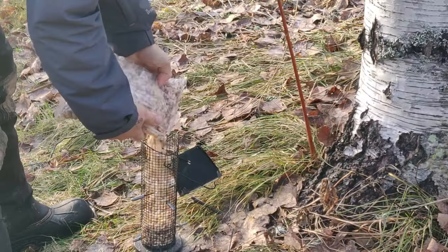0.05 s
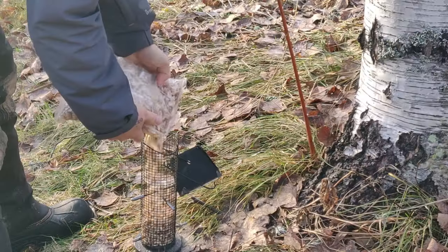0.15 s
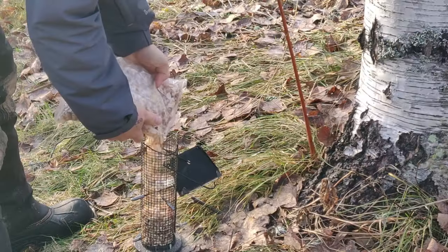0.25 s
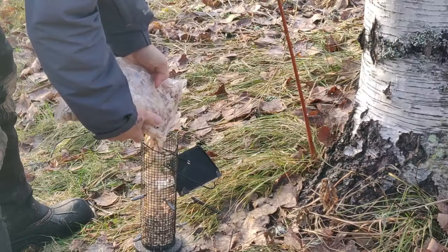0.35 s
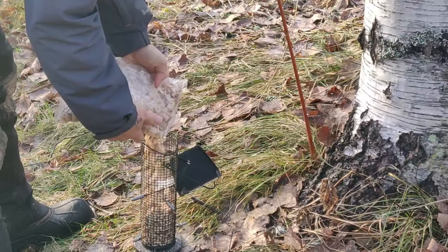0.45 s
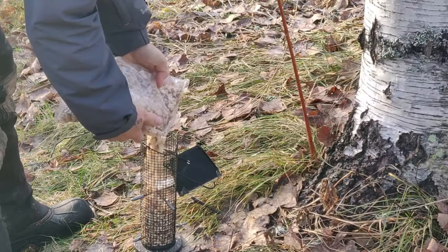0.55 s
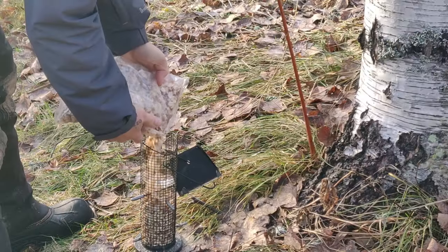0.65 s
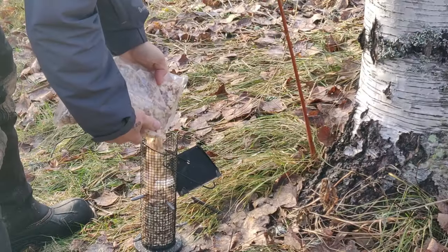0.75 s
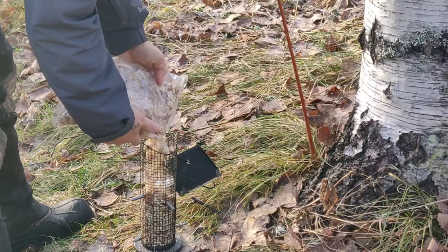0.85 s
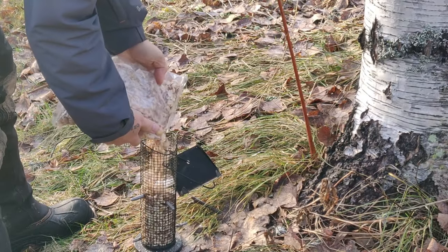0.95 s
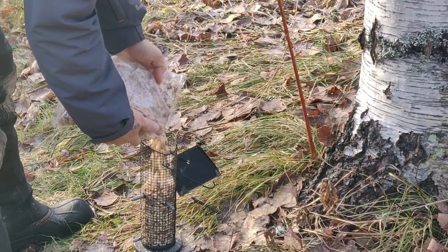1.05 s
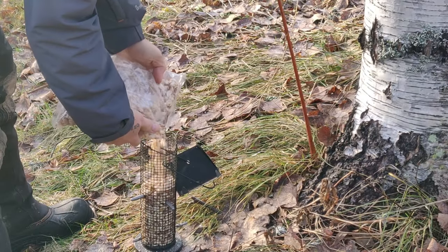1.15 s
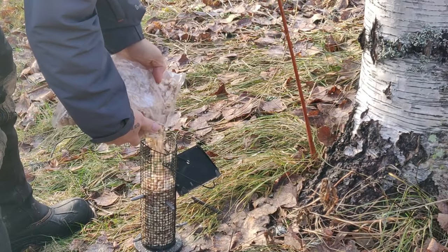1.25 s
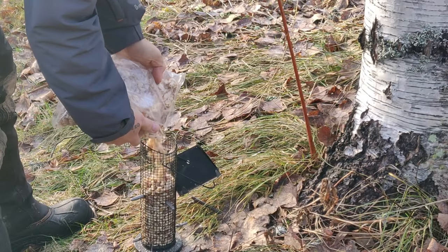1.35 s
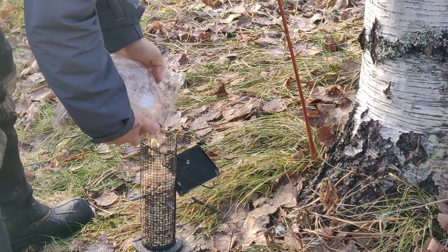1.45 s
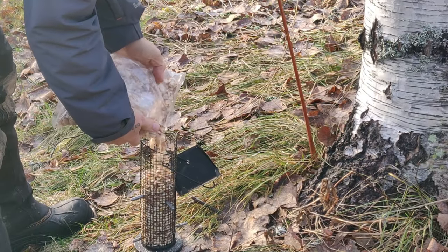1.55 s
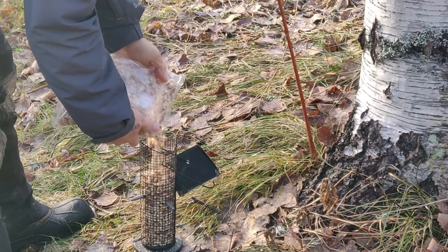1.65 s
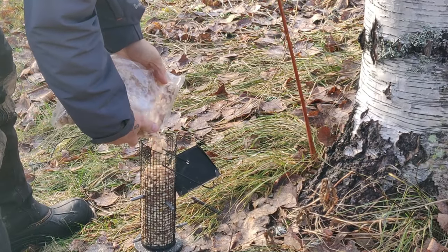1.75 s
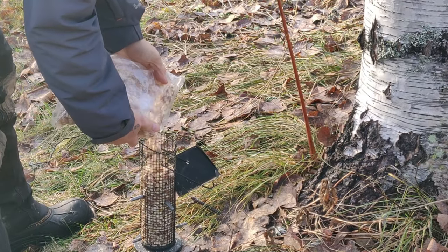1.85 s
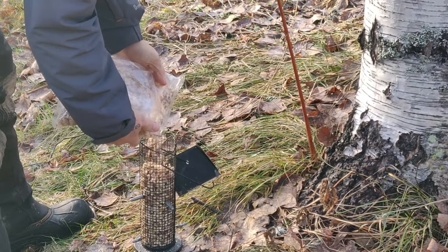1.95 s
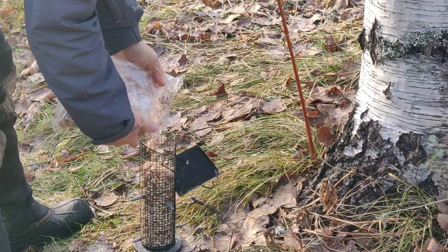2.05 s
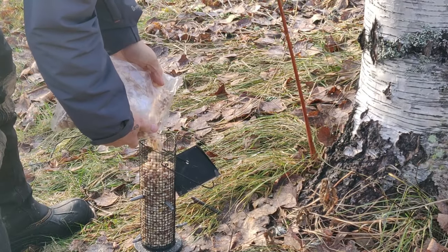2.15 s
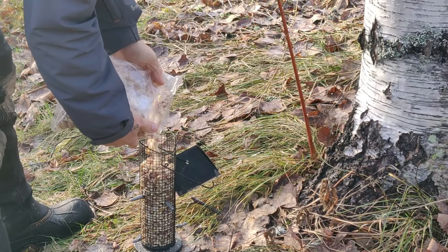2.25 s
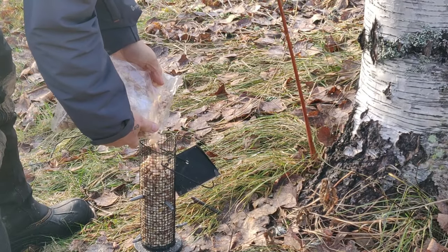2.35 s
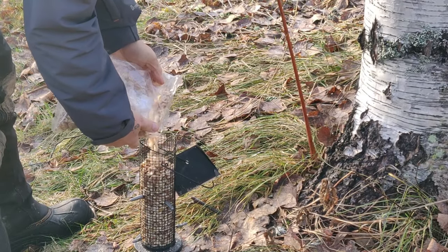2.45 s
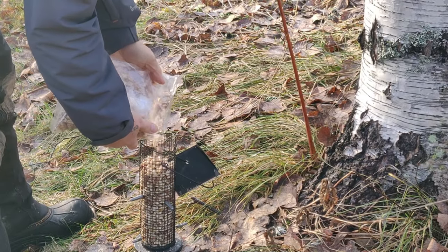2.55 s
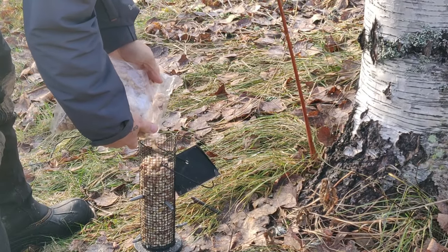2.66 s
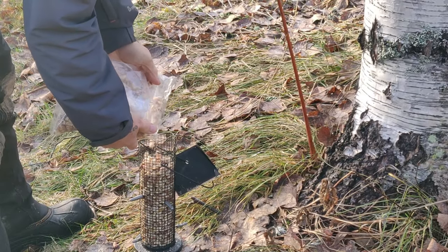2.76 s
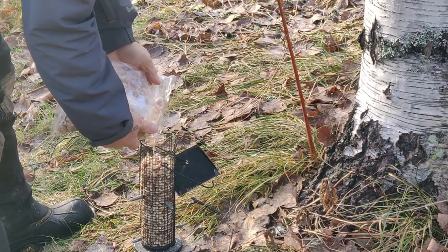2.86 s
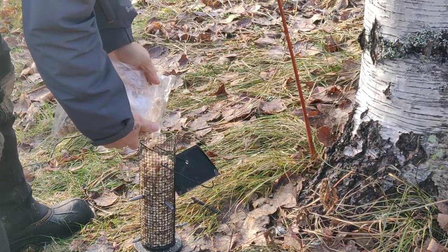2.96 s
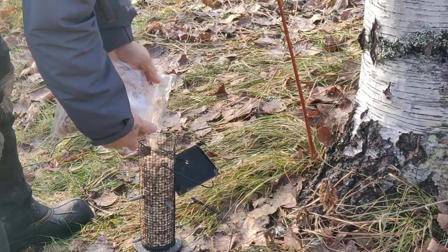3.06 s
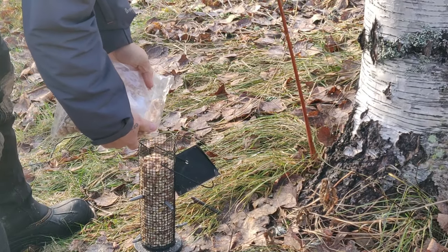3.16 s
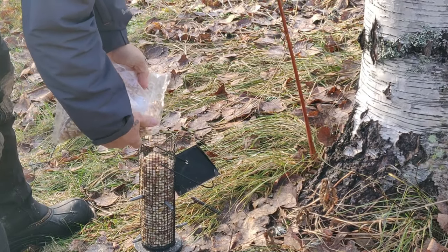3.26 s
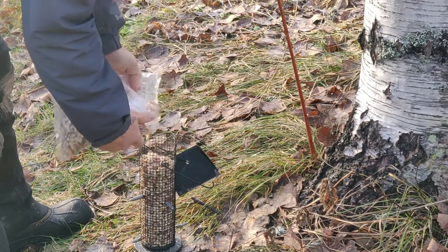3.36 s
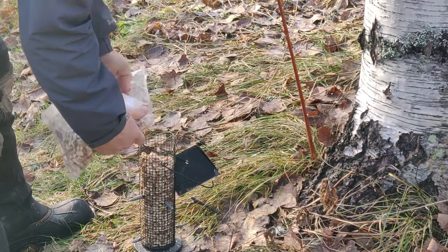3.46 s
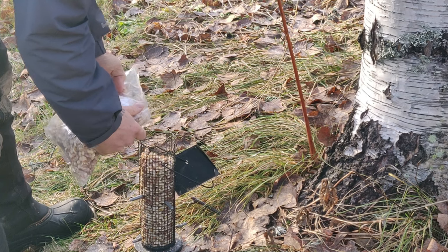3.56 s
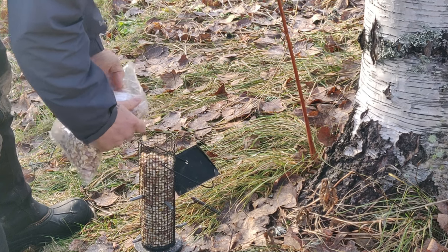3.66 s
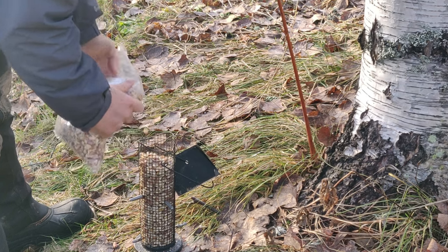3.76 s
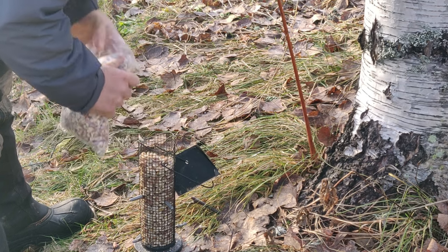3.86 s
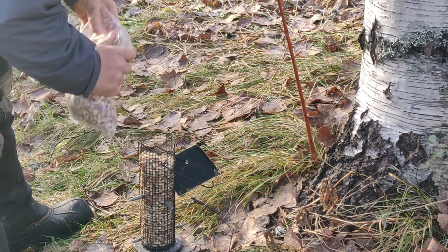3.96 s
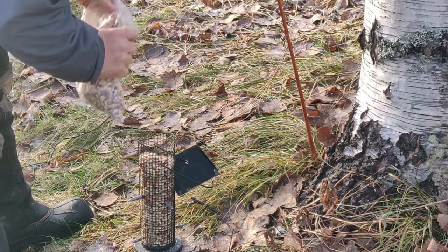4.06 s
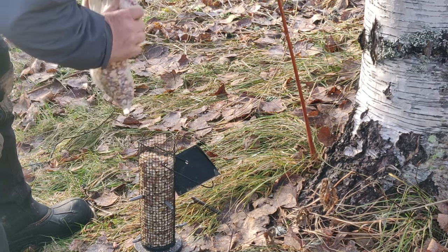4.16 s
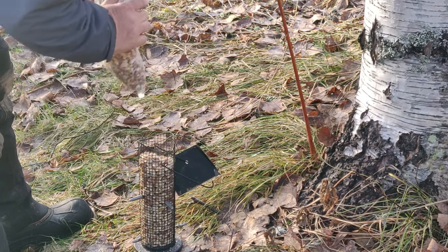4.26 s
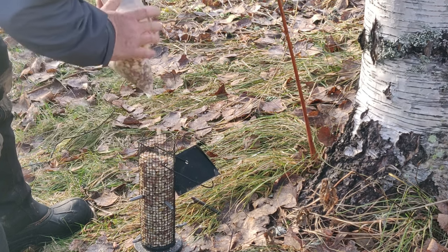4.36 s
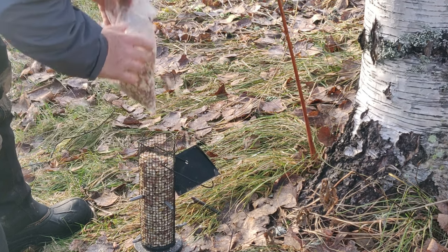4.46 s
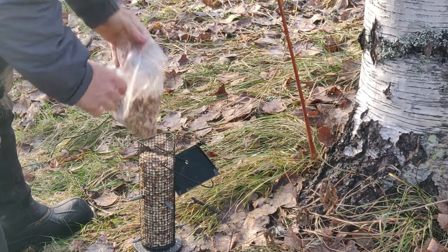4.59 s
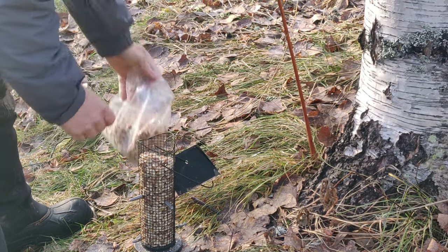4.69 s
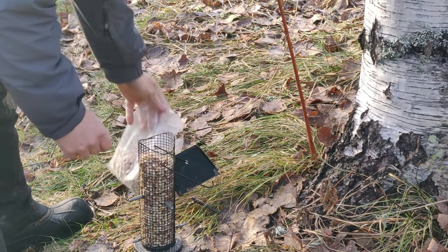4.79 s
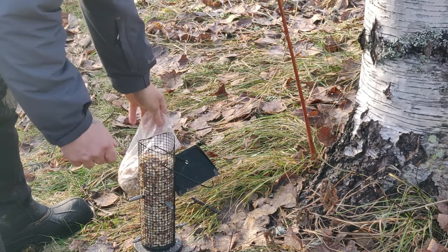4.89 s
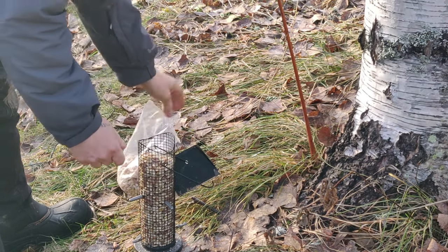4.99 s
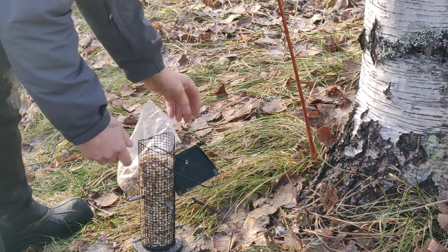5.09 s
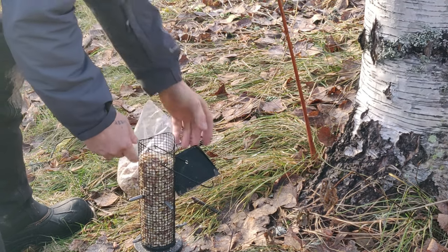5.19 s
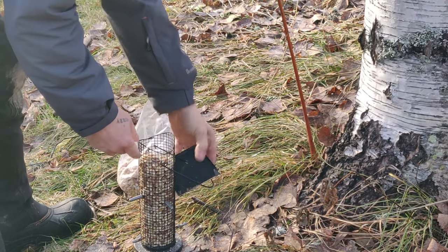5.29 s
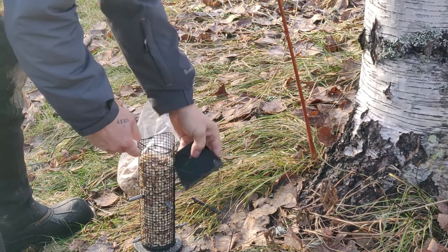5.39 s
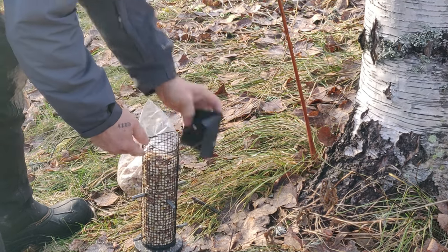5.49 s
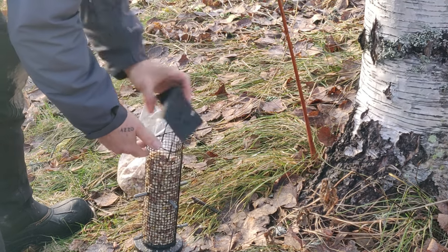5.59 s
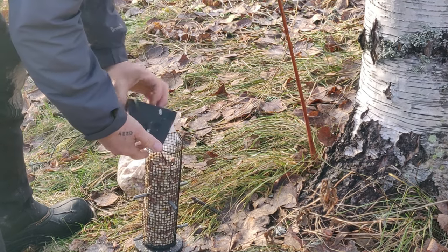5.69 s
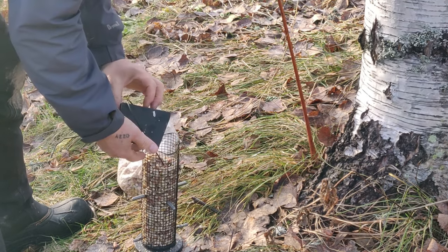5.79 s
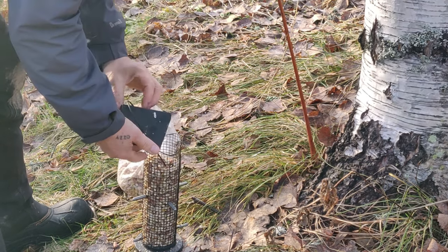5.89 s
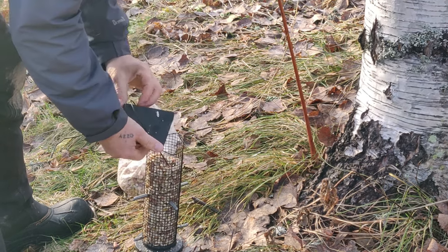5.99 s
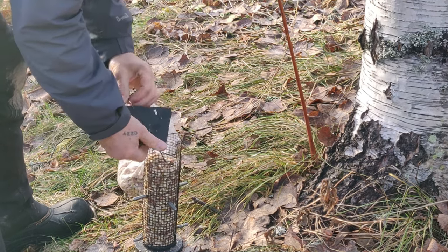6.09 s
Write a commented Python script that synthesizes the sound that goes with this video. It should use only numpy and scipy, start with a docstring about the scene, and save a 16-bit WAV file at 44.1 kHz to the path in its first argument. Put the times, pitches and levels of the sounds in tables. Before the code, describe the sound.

Outdoors, close up, dry seed pours quickly into a wire-mesh bird feeder, ticking and ringing thinly. The stream slackens after a second while the plastic bag crackles and snaps and a few kernels land dully. The bag is shaken and lifted with loud crisp crackling, set down with another burst, then a small lid clacks and scrapes on the rim. Bright, small stereo microphones, faint steady air.

```python
"""Seed pours from a thin plastic bag into a wire-mesh bird feeder in grass, and thins as the feeder fills.
The bag crinkles and snaps as it is shaken, lifted and put down; then the lid knocks and scrapes on the rim.
Kernels, film and creases are tiny noisy cracks given a colour; mesh and lid ring as decaying sines.
Filtered noise makes the still outdoor air. Two small microphone ports pick it all up, the left one
with a sharp treble resonance."""
import sys
import numpy as np
from scipy import signal
from scipy.fft import rfft, irfft
from scipy.io import wavfile
from scipy.ndimage import map_coordinates

SR = 44100
rng = np.random.default_rng(int(sys.argv[2]) if len(sys.argv) > 2 else 0)


def store_wav(level_fs):
    """Save 16-bit WAV to argv[1]."""
    pcm = np.round(np.clip(np.atleast_2d(level_fs), -1, 1) * 32767)
    wavfile.write(sys.argv[1], SR, pcm.T.astype(np.int16))


N = 270402
TIME = np.arange(N) / SR
BRIEF = TIME[:2560]   # time axis of one tiny impact


def from_db(db):
    """Decibels to gain."""
    return 10 ** (np.asarray(db) / 20)


def rms_one(x):
    """Scale to rms 1."""
    return x / np.sqrt(np.mean(x ** 2) + 1e-20)


def unit(x):
    """Scale to unit energy in the first channel."""
    return x / np.linalg.norm(np.atleast_2d(x)[0])


def gains(rows):
    """Each dB column of a curve as a gain in time, fading out beyond its ends."""
    s, *columns = np.transpose(rows)
    outside = np.maximum(0, np.maximum(s[0] - TIME, TIME - s[-1]))
    fade = np.exp(-(outside / 0.067) ** 2)
    return [from_db(np.interp(TIME, s, column)) * fade for column in columns]


ATTACK_S, RELEASE_S = 0.021, 0.015   # straight swell before the start; time constant of the dying away


def strokes(rows):
    """Movements of the hand swell, hold and die away; one gain in time for each dB column."""
    total = 0
    for s, length, *levels in rows:
        rise = np.clip(1 + (TIME - s) / ATTACK_S, 0, 1)
        fall = np.exp(-np.maximum(0, TIME - s - length) / RELEASE_S)
        total = total + from_db(levels)[:, None] * rise * fall
    return total


def drift(rate):
    """Random wandering with rms 1, taking a new direction `rate` times a second."""
    knots = rng.standard_normal(4096)
    return rms_one(np.interp(TIME * rate, np.arange(len(knots)), knots))


def response(points):
    """Causal (minimum-phase) impulse response of a spectrum."""
    size = 1024
    hz, db = np.transpose(points)
    grid = np.maximum(np.fft.rfftfreq(size, 1 / SR), 1)
    smooth_db = np.interp(np.log(grid), np.log(hz), db)
    cepstrum = irfft(np.log(from_db(smooth_db)))
    # folding the cepstrum forward puts all the response after the impulse
    cepstrum[1:size // 2] *= 2
    cepstrum[size // 2 + 1:] = 0
    return irfft(np.exp(rfft(cepstrum)))


def through(x, impulse):
    """Filter both channels with an impulse response."""
    return signal.oaconvolve(x, np.atleast_2d(impulse), axes=1)[:, :x.shape[1]]


def colour(x, points):
    """Give white sound a spectrum and keep its power."""
    return through(x, unit(response(points)))


def peak(x, hz, q=4):
    """The part of a sound around one pitch, at unit energy."""
    return unit(signal.lfilter(*signal.iirpeak(hz, q, fs=SR), x))


def add(out, s, sound):
    """Mix a sound in at time s."""
    start = min(round(s * SR), N - 1)
    out[:, start:start + sound.shape[1]] += sound[:, :N - start]


PORTS_PART_HZ, BASS_SIDE_DB = 3160, -9   # where the ports begin to differ; their difference in the bass


def diffuse(size, part_hz=PORTS_PART_HZ):
    """Noise from all round: nearly alike at both ports in the bass, unrelated in the treble."""
    mid, side = rng.standard_normal((2, size))
    b, a = signal.butter(1, part_hz, "high", fs=SR)
    bass_side = from_db(BASS_SIDE_DB)
    side = bass_side * side + (np.sqrt(.5) - bass_side) * signal.lfilter(b, a, side)
    mid = mid - (1 - np.sqrt(.5)) * signal.lfilter(b, a, mid)
    return mid + side * [[1], [-1]]


def crack(t60, scatter_db, scatter_t60):
    """One tiny impact of unit energy: a click, a brief buzz, then scatter off the ground and the tree."""
    click = signal.unit_impulse(len(BRIEF))
    buzz = unit(rng.standard_normal(len(BRIEF)) * from_db(-60 * BRIEF / t60))
    scatter = unit(diffuse(len(BRIEF)) * from_db(-60 * BRIEF / scatter_t60))
    return unit(click + buzz + from_db(scatter_db) * scatter)


GRAIN_T60_S = 0.06   # 60 dB decay time of the scatter behind each grain


def grains(per_s, spread_db, t60, scatter_db, low_hz, high_hz, ring_db, clump_db=2.5, count=48):
    """Random impacts of uneven size that come in louder clumps, each favouring one of many pitches; rms 1."""
    born = rng.random(N) < per_s / SR
    uneven_db = spread_db * np.clip(rng.standard_normal(N), -2, 2)
    clumps_db = clump_db * np.clip(drift(130), -1.7, 1.7)
    clicks = born * from_db(uneven_db + clumps_db) * rng.choice([-1, 1], N) / np.sqrt(per_s)
    shapes = []
    for hz in np.geomspace(low_hz, high_hz, count):
        plain = crack(t60, scatter_db, GRAIN_T60_S)
        shapes.append(unit(plain + from_db(ring_db) * peak(plain, hz)))
    dealt = rng.integers(0, count, N)
    out = np.zeros((2, N))
    for i in np.flatnonzero(born):
        add(out, i / SR, clicks[i] * shapes[dealt[i]])
    return rms_one(out)


def ringing(modes, spread_db=0):
    """Decaying sines of a struck body; spread_db varies the strength of each by chance."""
    t = TIME[:SR // 4]
    total = 0
    for k, (hz, db, t60) in enumerate(modes):
        decay = from_db(db + spread_db * rng.normal() - 60 * t / t60)
        total = total + decay * np.sin(2 * np.pi * hz * t) * (-1) ** k
    return total


# Colour of the outdoor air. Each row: frequency in Hz, level in dB per Hz.
AIR_COLOUR = [(20, 1.5), (60, 0), (130, -9.5), (300, -12.5), (600, -9), (1300, -18.5), (2200, -20),
              (4000, -15.5), (6500, -18), (9000, -9), (15000, -4.5)]
AIR_DB = -51.5   # before the microphone ports


def air():
    """Still outdoor air is a faint steady noise from all round."""
    return from_db(AIR_DB) * colour(diffuse(N, part_hz=394), AIR_COLOUR)


# Colour of the lid touching the wire. Each row: frequency in Hz, level in dB per Hz.
LID_COLOUR = [(100, -42), (400, -1.5), (900, -1), (1400, -14), (1900, -6.5), (2800, 2), (3600, -4),
              (5000, 1.5), (6500, 0), (8500, 2), (15000, -7)]
# The lid sliding on the wire. Each row: start of the hold in seconds, length in seconds,
# level in dB before it is shared out between slips and singing.
SLIDES_OF_LID = [(5.598, 0.057, -55), (5.685, 0.012, -52), (5.76, 0.034, -70), (5.912, 0.0076, -65),
                 (5.962, 0.012, -61.5), (6.005, 0.017, -63), (6.052, 0.021, -59)]


def lid_scrapes():
    """A sliding lid catches and slips in many tiny impacts, which also make the metal sing."""
    pressure, = strokes(SLIDES_OF_LID)
    slips = grains(350, spread_db=5.0, t60=0.0042, scatter_db=4.0, low_hz=1020, high_hz=6500, ring_db=-4.0)
    slips = colour(slips, LID_COLOUR)
    # each mode: Hz, dB, 60 dB decay time in seconds
    modes = [(1300, 2.5, 0.046), (1440, 4.0, 0.057), (2290, -10, 0.052),
             (2820, -15, 0.04), (5400, -10, .06), (6250, -6, 0.083)]
    singing = rms_one(through(slips, ringing(modes)))
    return pressure * (from_db(-7.0) * slips + from_db(-7.5) * singing)


# The notes in which the mesh tube rings.
# Each row: frequency in Hz, level in dB, 60 dB decay time in seconds.
MESH_MODES = [(766, -8, .11), (1075, -1.5, .035), (1267, -4, .03), (1354, -1, .04), (1434, -2, .04),
              (1497, -4, .08), (2745, -5, .04), (2900, -6, .03), (3585, -14, .12), (4982, -8, .14),
              (5229, -7, .11), (5493, -7, .09), (5773, -10, .1), (6012, -9, .06), (7029, -8, .14)]
# The notes of the lid when least held.
# Each row: frequency in Hz, level in dB, 60 dB decay time in seconds, all before the grip acts.
LID_MODES = [(754, -17, .15), (1980, -14, .12), (2510, -13, .1), (2780, -7, .06), (2900, -8, .04),
             (3079, -3, .35), (3135, -9, .07), (4045, -11, .09), (4200, -13, .07), (4490, -10, .17),
             (4900, -8, .09), (6455, -21, .09), (7004, -10, .1), (7321, -9, .05), (7600, -7, .1),
             (7887, -8, .11), (8371, -10, .08), (8533, -8, .06)]
# Lid against the rim. Each row: time in seconds, clack in dB, ring in dB, pitch of the panel in Hz,
# share of the free ring that the grip leaves (0 to 1), mesh in dB.
LID_KNOCKS = [(5.4017, -23, -53, 1540, 0.3, -54), (5.414, -20.5, -39.5, 1420, 0.85, -66),
              (5.459, -31, -49, 1400, 0.3, -62), (5.574, -20, -47, 1460, 0.27, -54),
              (5.602, -29, -55, 1450, 0.45, -65), (5.626, -32, -61, 1390, .4, -65),
              (5.646, -30, -68, 1460, .4, -65), (5.670, -17, -41.5, 1250, 0.42, -50.5),
              (5.681, -20, -58, 1460, 0.62, -56), (5.707, -28, -44.5, 1280, 0.14, -67),
              (5.815, -38, -63, 1340, 0.32, -76), (5.916, -38, -51, 1320, 0.25, -75),
              (5.958, -40, -52.5, 1330, 0.19, -68), (5.970, -37, -57, 1386, 0.27, -76),
              (6.053, -34, -62, 1310, .4, -69), (6.0863, -26.5, -46.5, 1280, 0.19, -70),
              (6.125, -24, -51, 1010, 0.22, -54)]
HAND_CLOSES_S, HELD_T60_S = 0.051, .03   # the fingers stop the lid's ring soon after a knock
GRIP_DETUNE = .14   # how strongly the grip shifts the pitch of the ring
CHATTER_S, CHATTER_DB = 0.001403, -6   # the lid's edge meets a second wire just after the first
BUZZ_DEPTH, BUZZ_PER_S = 0.16, 510   # loose contact roughens the ring


def lid_knocks():
    """A knock is a double clack, a short panel note, lid modes detuned and stopped by the hand, and mesh ring."""
    out = np.zeros((2, N))
    freest = max(free for *_, free, _ in LID_KNOCKS)
    for s, clack_db, ring_db, panel_hz, free, mesh_db in LID_KNOCKS:
        detune = 1 + GRIP_DETUNE * (freest - free) * rng.uniform(-1.04, 1)
        free = np.clip(free, .05, 1)
        note = ringing([(panel_hz, -4.0, .04)])
        thin_tail = (1 - free) * ringing([(panel_hz, -20, .16)])   # kept when pressed on the rim
        gripped = [(hz * detune, db, t60 * free / freest) for hz, db, t60 in LID_MODES]
        overtones = free * ringing(gripped, spread_db=4.5)
        held = from_db(-60 * np.maximum(0, TIME[:len(note)] - HAND_CLOSES_S) / HELD_T60_S)
        buzz = 1 + BUZZ_DEPTH * drift(BUZZ_PER_S)[:len(note)]
        ring = from_db(ring_db) * (note + thin_tail + overtones) * held * buzz
        mesh = from_db(mesh_db) * ringing(MESH_MODES)
        add(out, s, (ring + mesh)[None])
        for delay, db in ((0, 0), (CHATTER_S, CHATTER_DB)):
            clack = crack(t60=.011, scatter_db=-0.5, scatter_t60=.05)
            add(out, s + delay, from_db(clack_db + db) * colour(clack, LID_COLOUR))
    return out


# Large kernels landing on the heap. Each row: time in seconds, level in dB, pitch in Hz.
KERNEL_THUDS = [(1.776, -33.5, 570), (1.831, -28, 680), (1.974, -25.5, 635), (2.031, -31, 600),
                (2.075, -31.5, 630), (2.105, -33, 650), (2.225, -28.5, 605), (2.267, -32, 1130),
                (2.528, -36, 620), (2.588, -34.5, 620), (2.655, -42, 596), (3.112, -34, 520),
                (3.242, -34, 780), (3.429, -31, 1000), (3.463, -29, 700), (3.541, -28.5, 760),
                (3.664, -31, 740), (3.757, -33, 715), (4.037, -28, 654), (4.21, -24, 373),
                (4.356, -31, 410)]
# Colour of a thud at the pitch HEAP_HZ. Each row: frequency in Hz, level in dB per Hz.
HEAP_COLOUR = [(150, -18.5), (380, -6), (650, 3.5), (900, -6), (1500, -37), (4000, -17)]
HEAP_HZ = 650


def heap():
    """Large kernels land dully on the pile, in the feeder and later in the bag; pitch shifts the whole colour."""
    out = np.zeros((2, N))
    for s, db, pitch_hz in KERNEL_THUDS:
        spectrum = [(hz * pitch_hz / HEAP_HZ, level) for hz, level in HEAP_COLOUR]
        thud = colour(crack(t60=0.0061, scatter_db=1.0, scatter_t60=0.074), spectrum)
        add(out, s, from_db(db) * unit(thud))
    return out


# Colours of the crinkling film and of the dull load of seed and sheet.
# Each row: frequency in Hz, level in dB per Hz.
FILM_COLOUR = [(300, -7.5), (1000, -24.5), (1800, -11.5), (3500, -4), (6000, 0.5), (9000, 5.5),
               (15000, 2.5)]
LOAD_COLOUR = [(40, -45), (130, 1), (200, -4.5), (280, 5.5), (700, 4), (1300, 3.5), (2500, -1),
               (6000, -5.5)]
# How hard the bag is worked while it is emptied, lifted away and put down.
# Each row: time in seconds, effort in dB before the film's final lift.
BAG_EFFORT = [(1.15, -57.5), (1.7, -57), (2.5, -59.5), (3.1, -64), (3.45, -54), (3.68, -57), (3.98, -48.5),
              (4.151, -46), (4.301, -52.5), (4.45, -63), (4.757, -67), (4.809, -42.5), (4.951, -46),
              (5.03, -53), (5.1, -74), (5.4, -79)]
# Single squeezes and shakes. Each row: start of the hold in seconds, length in seconds,
# film in dB before its final lift, shifting seed in dB before its final cut.
BAG_SQUEEZES = [(1.70, 0.052, -52, -73), (1.96, 0.073, -54, -62.5), (2.14, 0.022, -57, -58.5),
                (2.428, 0.0083, -53, -63), (2.63, 0.028, -54, -53.5), (2.79, 0.033, -61, -54.5),
                (3.42, 0.055, -66, -58), (3.525, 0.023, -47.5, -48), (3.655, 0.0037, -65, -54),
                (3.92, 0.031, -46.5, -55), (4.168, 0.042, -43.5, -49.5), (4.64, 0.0078, -56, -67),
                (4.85, 0.019, -47, -53), (5.49, 0.043, -60.5, -74)]
LOAD_DB, LOAD_FOLLOWS = -50, 0.7   # rustle at full effort, before its final cut; share of the effort's swing


def bag():
    """The film crinkles, faster when worked harder, and the seed left inside shifts dully."""
    effort, = gains(BAG_EFFORT)
    squeeze, shift = strokes(BAG_SQUEEZES)
    crinkle = np.hypot(effort, squeeze)
    rustle = np.hypot(from_db(LOAD_DB) * (effort / effort.max()) ** LOAD_FOLLOWS, shift)
    per_s = 220 + 1400 * crinkle / crinkle.max()
    film = grains(per_s, spread_db=5.0, t60=0.0036, scatter_db=3.0, low_hz=2340, high_hz=10000,
                  ring_db=1.5, clump_db=1.5)
    load = grains(450, spread_db=2.0, t60=0.013, scatter_db=2.0, low_hz=264, high_hz=1990, ring_db=-21.0)
    film = from_db(4.0) * crinkle * colour(film, FILM_COLOUR)      # final lift
    load = from_db(-4.0) * rustle * colour(load, LOAD_COLOUR)      # final cut
    return film + load


RANDOM_SNAPS_PER_S, RANDOM_SNAPS_FROM_S, RANDOM_SNAPS_TO_S = 12, 1.0, 4.45
RANDOM_SNAP_DB, RANDOM_SNAP_SPREAD_DB = -22.5, 1   # average at full effort; standard deviation
RANDOM_SNAP_FOLLOWS, RANDOM_BODY_DB = 0.24, -19   # share of the effort's swing; dull body against the snap


def random_snaps():
    """More creases give way at random times, louder under more effort: (seconds, snap dB, body dB)."""
    slots = np.arange(RANDOM_SNAPS_FROM_S, RANDOM_SNAPS_TO_S, 1 / RANDOM_SNAPS_PER_S)
    chance = rng.random((256, 3))[:len(slots)]
    times = slots + chance[:, 0] / RANDOM_SNAPS_PER_S
    s, effort_db = np.transpose(BAG_EFFORT)
    uneven_db = RANDOM_SNAP_SPREAD_DB * np.sqrt(3) * (2 * chance[:, 1:] - 1)
    below_full_db = np.interp(times, s, effort_db) - effort_db.max()
    db = RANDOM_SNAP_DB + RANDOM_SNAP_FOLLOWS * below_full_db
    return list(zip(times, db + uneven_db[:, 0], db + RANDOM_BODY_DB + uneven_db[:, 1]))


# Single creases snapping over, loud and faint.
# Each row: time in seconds, sharp snap in dB, dull body in dB.
TIMED_SNAPS = [(1.172, -12.5, -38), (1.1965, -31, -36), (1.239, -15.5, -45), (1.3654, -24, -31),
               (1.3943, -17, -32), (1.464, -16, -47), (1.4775, -15, -41), (1.533, -12.5, -42),
               (1.598, -19, -35), (1.685, -20, -31), (1.7083, -21, -40.5), (1.814, -19.5, -33),
               (1.827, -19, -34), (1.875, -22.5, -36), (1.9693, -17, -34), (2.215, -25, -52),
               (2.237, -13.5, -43.5), (2.2633, -13.5, -28), (2.267, -25, -36), (2.283, -22, -34),
               (2.334, -23, -48), (2.371, -18.5, -46), (2.426, -20.5, -27.5), (2.588, -26, -40),
               (2.6757, -16.5, -29.5), (2.7261, -18, -30.5), (2.8691, -36, -33.5), (3.006, -19, -50),
               (3.021, -17, -55), (3.1368, -21, -46), (3.1651, -23.5, -31), (3.202, -16.5, -27),
               (3.271, -17.5, -24.5), (3.31, -20, -30.5), (3.3675, -22, -34.5), (3.4336, -26, -33),
               (3.482, -21, -34), (3.5164, -13, -27.5), (3.5231, -14, -44), (3.541, -33, -26),
               (3.7058, -14, -26), (3.7308, -16, -51), (3.737, -16.5, -30), (3.7994, -10, -25),
               (3.865, -31, -35.5), (3.916, -23, -40), (4.0305, -9, -39), (4.056, -3.5, -35),
               (4.081, -14, -43), (4.086, -19.5, -44), (4.109, -14.5, -42), (4.122, -17, -25),
               (4.1448, -11, -36), (4.152, -9, -43), (4.165, -18, -35), (4.1865, -20, -40),
               (4.1988, -17, -30), (4.213, -13.5, -23.5), (4.222, -11, -40), (4.2285, -13.5, -50),
               (4.3766, -12.5, -36), (4.4116, -22.5, -42), (4.4916, -7, -47), (4.5431, -16.5, -29.5),
               (4.5554, -22, -44), (4.632, -24.5, -40), (4.6406, -27.5, -28), (4.6987, -16, -25.5),
               (4.717, -26, -40), (4.743, -26, -50), (4.7942, -14, -47.5), (4.806, -13, -41),
               (4.8235, -17, -41), (4.8508, -4.5, -22), (4.856, -22, -40), (4.878, -21, -37),
               (4.9176, -20, -30), (4.939, -16, -37), (4.9514, -24, -33), (4.976, -22, -40),
               (4.981, -24, -40), (5.0507, -31, -29.5)]
# Thin, very high zips of film slipping on film. Each row: time in seconds, level in dB.
FILM_ZIPS = [(1.508, -0.5), (3.007, -14), (3.7067, -30.5), (4.053, -24), (4.4914, -35)]
# Colour of a zip. Each row: frequency in Hz, level in dB per Hz.
ZIP_COLOUR = [(4000, -52), (8000, -13), (11000, 1), (16000, 0)]
CREASE_LOW_HZ, CREASE_HIGH_HZ, CREASE_RING_DB = 2980, 9560, -8.5   # each crease favours a pitch in this range
GROUND_ECHO_S, GROUND_ECHO_DB = .0061, -14


def snaps():
    """A crease buckles with a pitched crack, its ground echo and a dull pat; a zip is a fizz in the top treble."""
    out = np.zeros((2, N))
    for s, snap_db, body_db in TIMED_SNAPS + random_snaps():
        plain = crack(t60=0.008, scatter_db=-1.0, scatter_t60=0.046)
        hz = CREASE_LOW_HZ * (CREASE_HIGH_HZ / CREASE_LOW_HZ) ** rng.random()
        pitched = unit(plain + from_db(CREASE_RING_DB) * peak(plain, hz))
        snap = from_db(snap_db) * colour(pitched, FILM_COLOUR)
        pat = crack(t60=0.013, scatter_db=3.5, scatter_t60=0.087)
        add(out, s, snap + from_db(body_db) * colour(pat, LOAD_COLOUR))
        add(out, s + GROUND_ECHO_S, from_db(GROUND_ECHO_DB) * snap)
    for s, db in FILM_ZIPS:
        fizz = crack(t60=0.0087, scatter_db=15.0, scatter_t60=.03)
        add(out, s, from_db(db) * colour(fizz, ZIP_COLOUR))
    # a thin sheet radiates little bass
    return signal.sosfilt(signal.butter(2, 280, "high", fs=SR, output="sos"), out)


# Colour of kernels ticking. Each row: frequency in Hz, level in dB per Hz.
TICK_COLOUR = [(100, -26), (380, -12.5), (750, -3), (1400, -4), (1800, -5.5), (2300, -9), (2850, 0),
               (3500, -7), (4400, -4), (5400, 2.5), (6000, 3), (6500, -1.5), (9000, 5), (15000, 1)]
# Kernels that hit a wire squarely.
# Each row: time in seconds, tick in dB, ring of the mesh in dB, pitch of the wire in Hz.
WIRE_STRIKES = [(0.042, -15, -47, 6100), (0.067, -14, -47, 5860), (0.1175, -16, -50, 5750),
                (0.179, -9, -47, 6200), (0.206, -10, -56, 6000), (0.2447, -16, -49, 5600),
                (0.301, -24, -51, 6460), (0.3635, -19, -50, 6300), (0.3805, -26, -55, 5600),
                (0.425, -14, -66, 5500), (0.454, -28, -62, 5800), (0.491, -15, -62, 5500),
                (0.515, -20, -61, 2880), (0.597, -11, -48, 6000), (0.695, -15, -60, 6000),
                (0.801, -20.5, -56.5, 5800), (0.855, -16, -56, 6000), (0.995, -20.5, -59.5, 6100),
                (1.594, -31, -71, 6200), (1.726, -24, -63, 6140), (1.967, -16.5, -69, 5530),
                (2.139, -34, -58, 6200), (2.283, -33, -61, 6200), (2.73, -28, -61, 6000),
                (2.811, -45, -59, 6160), (2.869, -41, -59.5, 6200), (3.088, -31, -63.5, 6140),
                (3.364, -38, -56.5, 6200)]
WIRE_Q, WIRE_PING_DB = 14, -8.5   # sharpness of a wire's ping; its level against the tick


def strikes():
    """Single kernels hit a wire squarely: a tick, the brief ping of that wire and a short ring of the mesh."""
    out = np.zeros((2, N))
    for s, tick_db, ring_db, wire_hz in WIRE_STRIKES:
        tick = colour(crack(t60=0.008, scatter_db=-3.0, scatter_t60=0.04), TICK_COLOUR)
        ping = peak(tick, wire_hz, WIRE_Q)
        add(out, s, from_db(tick_db) * unit(tick + from_db(WIRE_PING_DB) * ping))
        add(out, s, from_db(ring_db) * ringing(MESH_MODES, spread_db=3.5)[None])
    return out


# Stream of seed, full at first, then a trickle.
# Each row: time in seconds, flow in dB before the cushioning of the heap.
SEED_FLOW = [(0.0, -39), (0.6, -41), (1.0, -43.5), (1.35, -53), (1.8, -53.5), (2.1, -59.5), (2.5, -63.5),
             (3.3, -57)]
# Gushes as the bag is tipped further. Each row: start of the hold in seconds, length in seconds,
# flow in dB before the cushioning of the heap.
SEED_GUSHES = [(0.0, 0.023, -35), (0.16, 0.092, -40.5), (0.36, 0.024, -39), (0.98, 0.044, -50),
               (1.16, 0.097, -48.5), (1.44, 0.045, -50)]
MESH_DB, MESH_FOLLOWS = -44.8, .9   # ring of the mesh at full flow; share of the flow's swing


def seed():
    """Kernels tick on each other and ring the mesh; a stronger stream brings more of them."""
    flow = np.hypot(gains(SEED_FLOW), strokes(SEED_GUSHES))[0]
    fullness = flow / flow.max()
    per_s = 80 + 1200 * fullness
    ticks = grains(per_s, spread_db=1.7, t60=0.003, scatter_db=3.5, low_hz=2600, high_hz=9000,
                   ring_db=-4.0, clump_db=1.0)
    hits = grains(per_s, spread_db=2.0, t60=0.0037, scatter_db=-18.0, low_hz=1110, high_hz=6900,
                  ring_db=-10.5, clump_db=1.5)
    mesh = rms_one(through(hits, ringing(MESH_MODES)))
    deadening_db_per_s = -2.0   # the rising heap cushions the fall
    cushioning = from_db(4.0 + deadening_db_per_s * TIME)
    rush = flow * cushioning * colour(ticks, TICK_COLOUR)
    return rush + from_db(MESH_DB) * fullness ** MESH_FOLLOWS * mesh


def scene():
    """All the handling happens at one spot, in a faint wash of outdoor air."""
    return air() + lid_scrapes() + lid_knocks() + heap() + bag() + snaps() + strikes() + seed()


# Colours of the two microphone ports. Each row: frequency in Hz, level in dB.
LEFT_COLOUR = [(2000, 7.5), (3300, 1), (4500, 5), (5600, 8), (6100, 10.5), (6500, 12), (7200, 2),
               (8300, -6.5), (9300, -21), (10500, -21.5), (12500, -19), (15000, -16)]
RIGHT_COLOUR = [(2000, 7), (4000, -1.5), (6000, -0.5), (8300, -2), (9200, -5), (10400, -23), (12000, -17.5),
                (15000, -13.5)]
PORT_LAG_S, CUTOFF_HZ = .00006, 16000


def record(dry):
    """Sound reaches the right port a little later; each port has its own colour; the top is cut."""
    left, right = through(dry, [response(LEFT_COLOUR), response(RIGHT_COLOUR)])
    right = map_coordinates(right, [(TIME - PORT_LAG_S) * SR], order=3)
    top_cut = signal.ellip(10, .1, 80, CUTOFF_HZ, fs=SR, output="sos")
    return signal.sosfilt(top_cut, [left, right])


dry = scene()
out = record(dry)
store_wav(out)
```